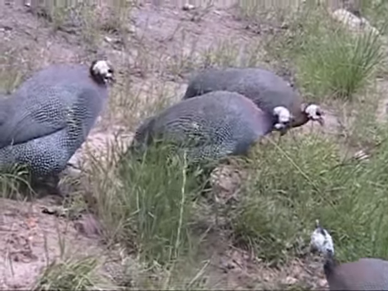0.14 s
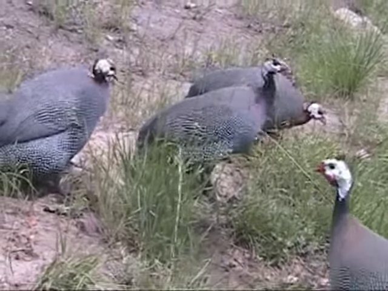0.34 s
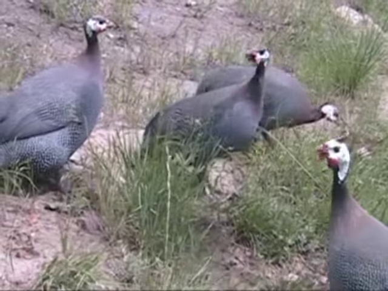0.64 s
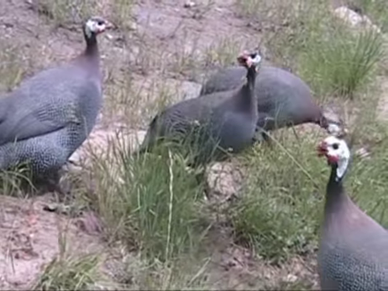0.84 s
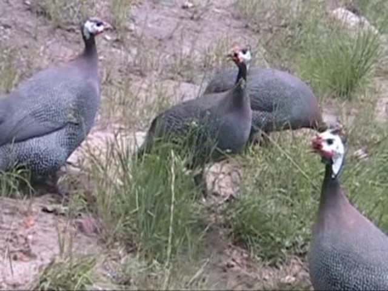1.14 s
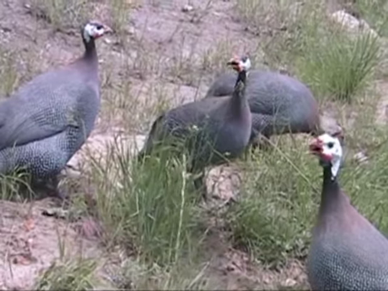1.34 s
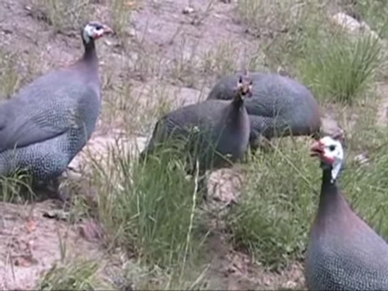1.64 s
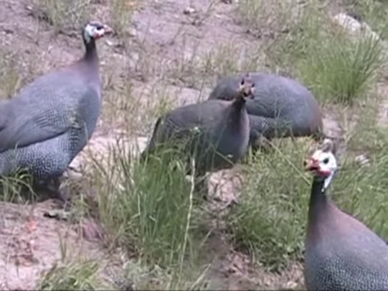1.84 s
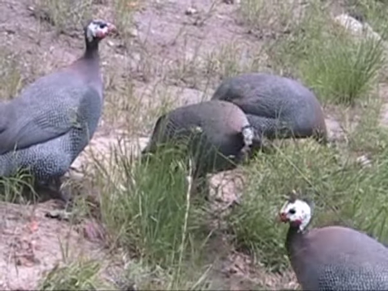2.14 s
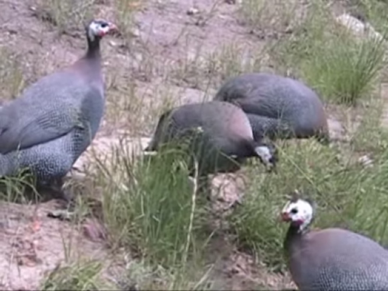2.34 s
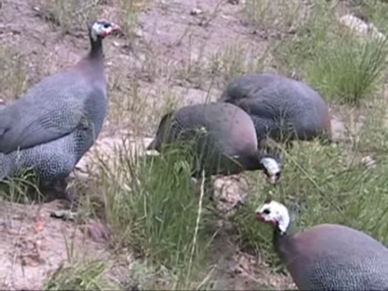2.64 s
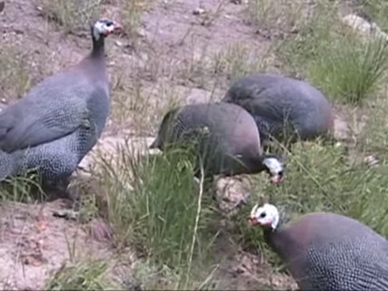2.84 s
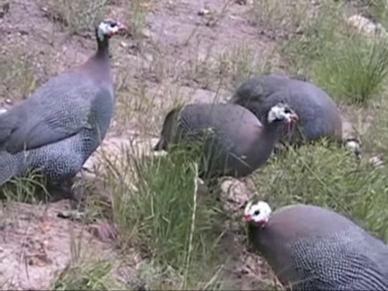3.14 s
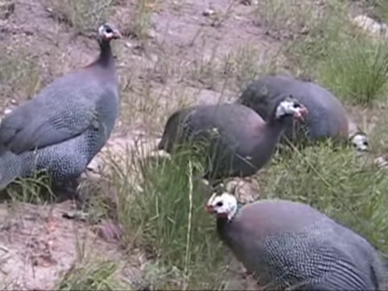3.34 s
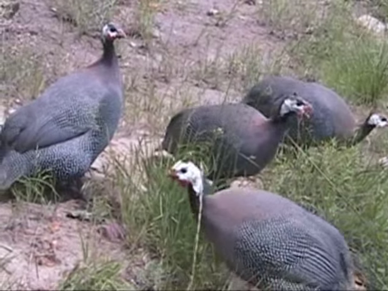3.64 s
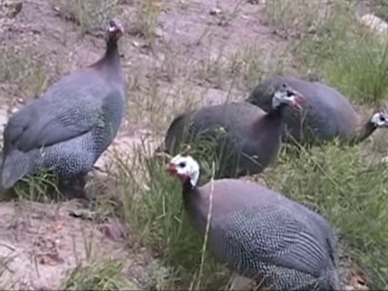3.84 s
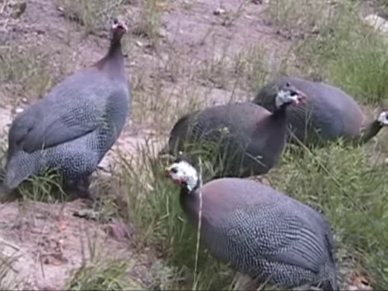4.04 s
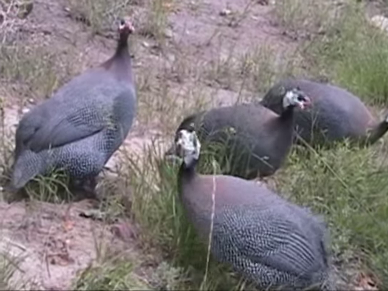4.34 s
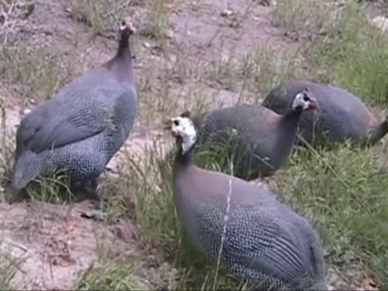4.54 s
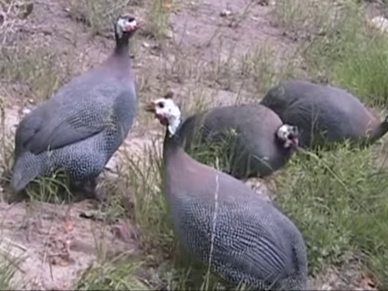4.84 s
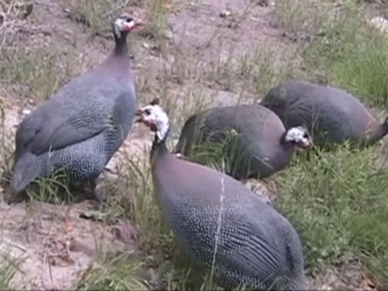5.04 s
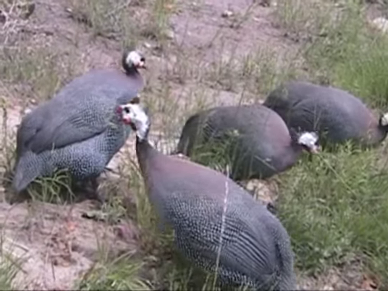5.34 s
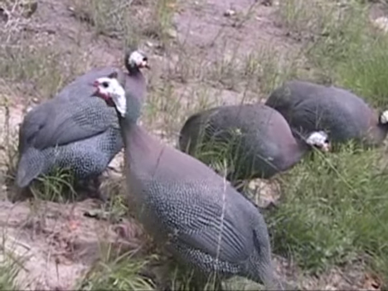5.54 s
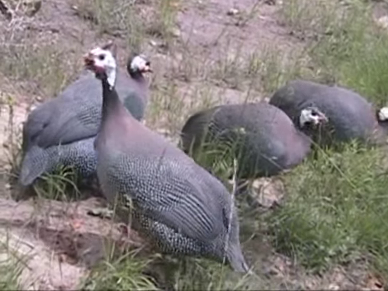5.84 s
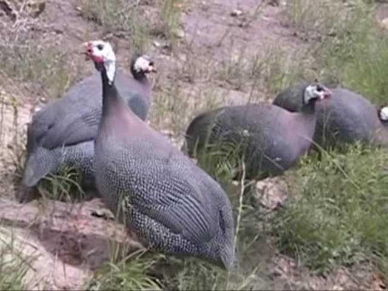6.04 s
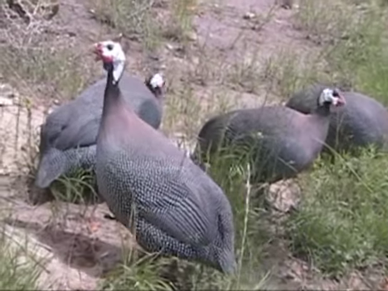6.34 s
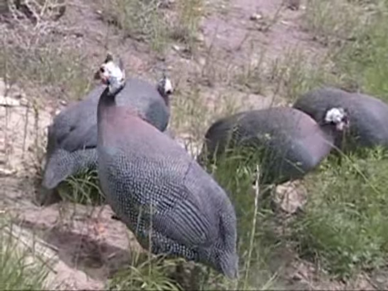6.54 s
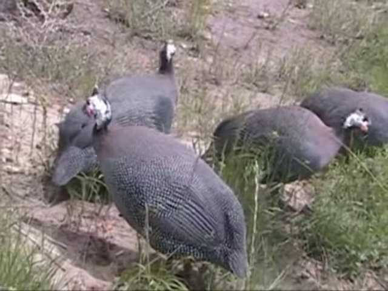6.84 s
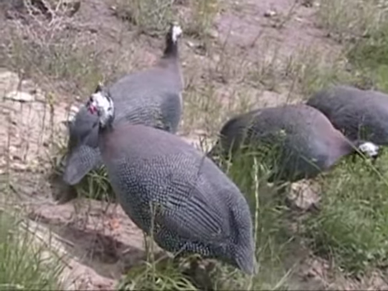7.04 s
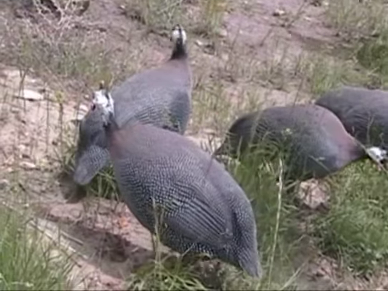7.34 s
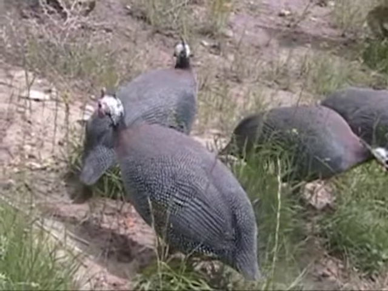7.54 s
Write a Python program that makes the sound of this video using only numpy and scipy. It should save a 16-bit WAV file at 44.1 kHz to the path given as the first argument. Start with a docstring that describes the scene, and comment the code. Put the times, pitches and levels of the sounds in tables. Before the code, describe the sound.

Harsh guinea fowl chatter outdoors: hard clipped cheks in steady runs, longer pulsing squawks, short rattles and squeaky peeps, with light wind buffeting.

```python
"""Guinea fowl call on a grassy slope: long fluttering squawks with short rattles, cheks and whistled peeps.
Squawks, rattles and the rasp of each chek drive throat and beak resonances with a rough pulsing voice;
cheks start with a hard whistle, and peeps are unsteady partials with hoarse breath. A short bright scatter
follows each call and a far wall returns it once. Lumpy wind noise buffets two microphone ports over a hush,
an uneven treble hiss and a faint hum."""
import sys
import numpy as np
from scipy import signal
from scipy.fft import rfft, irfft
from scipy.io import wavfile
from scipy.ndimage import uniform_filter1d

SR = 44100
rng = np.random.default_rng(int(sys.argv[2]) if len(sys.argv) > 2 else 0)


def pcm_store(signal):
    """Save signal as 16-bit PCM."""
    levels = np.round(np.clip(np.atleast_2d(signal), -1, 1) * 32767)
    wavfile.write(sys.argv[1], SR, levels.astype(np.int16).T)


N = 339570  # samples

# Wind buffeting the ports. Each row: frequency in Hz, relative density in dB per Hz.
BUFFET_SPECTRUM = [(20, -15), (54, 5.5), (104, 2), (255, -3), (576, -22.5), (972, -66)]
# Wind strength. Each row: time in seconds, push in opposite directions in dB, push on both alike in dB.
WIND_LEVELS = [(0, -36, -49), (.18, -52, -64), (.36, -28.5, -42.5), (0.801, -25, -37.5), (.96, -55, -45),
               (1.053, -29, -30), (1.16, -61, -66), (1.5, -62, -73), (2.2, -84, -77), (2.83, -34, -44),
               (3.08, -29, -44.5), (3.22, -52.5, -55), (5.9, -52.5, -59.5), (6.45, -64.5, -68.5),
               (6.7, -37.5, -47), (6.88, -51.5, -58.5), (7.46, -20.5, -36), (7.69, -56, -38)]
# Outdoor hush. Each row: frequency in Hz, relative density in dB per Hz.
HUSH_SPECTRUM = [(40, -50), (300, -6), (1000, -2), (2500, -9), (4500, -12), (6500, -23), (11000, -31),
                 (15500, -46.5)]
# Treble hiss of uneven level. Each row: frequency in Hz, relative density in dB per Hz.
TREBLE_HISS_SPECTRUM = [(1500, -38), (4500, -9.5), (8000, -0.5), (11500, -6.5), (15500, -23)]
# Quiet bed. Each row: time in seconds, level of hush and hum in dB, level of the treble hiss in dB.
BED_LEVELS = [(0, -52.5, -61.5), (1.5, -52.5, -59.5), (2.2, -56, -66), (3.0, -47, -65), (3.12, -48, -55.5),
              (3.38, -52, -53), (3.5, -45, -63), (4.2, -48, -53), (5.4, -49, -60), (6.7, -55.5, -67.5),
              (7.7, -48, -61.5)]
# Faint hum. Each row: frequency in Hz, level against the shared hush in dB.
HUM_TONES = [(150, -16.5)]
# Whistled peeps; the row at 7.289 s is the drawn-out whistle that opens the chek at 7.29 s. Each row: start in
# # seconds, length in seconds, middle pitch in Hz, glide from end to end in Hz, level in dB, hoarseness in dB,
# # place of the crest as a share of the length.
PEEP_CALLS = [(0.032, 0.072, 1193, 14, -25, -0.5, 0.8), (0.284, 0.071, 4220, -1100, -43, -2.5, 0.65),
              (0.37, 0.08, 2350, -54, -51, -24.5, 0.5), (0.468, 0.085, 2680, 141, -52, -17.5, 0.2),
              (0.562, 0.032, 5280, 552, -33.5, -6, 0.3), (0.59, 0.022, 5160, -200, -25, -6, 0.5),
              (0.613, 0.029, 4980, -170, -10.5, -16, 0.64), (0.636, 0.021, 4490, 69, -13, -14, 0.06),
              (0.637, 0.021, 2930, -150, -25, -14, 0.65), (0.638, 0.028, 1765, 12, -25.5, -9, 0.48),
              (0.817, 0.11, 1122, -33, -27, -7.5, 0.96), (1.801, 0.09, 1109, 140, -37, 2, 0.7),
              (2.092, 0.059, 1090, -61, -37.5, 2, 0.77), (2.295, 0.078, 3118, 171.5, -37, -12, 0.33),
              (2.315, 0.036, 1850, 18, -22, -20.5, 0.47), (2.345, 0.03, 1697, 34, -25.5, -16, 0.08),
              (2.36, 0.09, 3850, 84, -53, -12, 0.7), (2.529, 0.055, 1156, -20, -34.5, 6, 0.35),
              (2.538, 0.013, 3200, -170, -14, -9, 0.55), (2.796, 0.041, 3740, -600, -12, -9, 0.6),
              (2.816, 0.018, 1780, -220, -15, 4.5, 0.52), (2.962, 0.059, 1855, 155, -30.5, -28, 0.35),
              (2.977, 0.083, 1174, 113, -33, -14, 0.32), (3.389, 0.038, 3840, -340, -14.5, -7.5, 0.84),
              (3.404, 0.032, 1065, -40, -25.5, -15, 0.8), (3.405, 0.018, 1714, -330, -10, 1.5, 0.37),
              (3.669, 0.076, 1834, 43, -28.5, -39, 0.26), (3.697, 0.028, 1493, -100, -25, -23, 0),
              (3.683, 0.13, 1160, 81, -26, -21.5, 0.13), (3.807, 0.033, 1112, -112, -15.5, 0.5, 0.38),
              (4.157, 0.091, 1810, 221, -11.5, -15, 0.88), (4.195, 0.053, 1168, -54, -26.5, -27.5, 0.8),
              (4.213, 0.038, 3240, 145, -25.5, -25, 0.5), (4.347, 0.027, 1580, -260, -20, -43.5, 1),
              (4.351, 0.15, 1100, 71, -20.5, -13, 0.32), (4.406, 0.017, 3740, 814, -14, -38, 0.26),
              (4.585, 0.034, 1073, -18, -20.5, 0, 0.42), (4.851, 0.047, 2560, 191, -37.5, -16, 0.5),
              (5.016, 0.084, 1778, 111, -16, -11, 0.26), (5.023, 0.16, 1097, -12, -22.5, -20.5, 0),
              (5.083, 0.19, 2140, 27, -35.5, -9.5, 0.1), (5.044, 0.017, 3790, -200, -8.5, -1.5, 1),
              (5.052, 0.016, 3180, -560, -4, -12.5, 0.8), (5.551, 0.031, 1052, 127, -23.5, -10, 0.44),
              (6.781, 0.11, 1216, 45, -25.5, -9.5, 0.87), (7.044, 0.024, 3480, -520, -10, -16, 0.37),
              (7.05, 0.016, 1690, -150, -10, 1, 0.83), (7.289, 0.04, 3530, 40, -15, -16, 0.3),
              (7.56, 0.036, 1200, 52, -36.5, 8, 0.7), (7.568, 0.0185, 4190, -200, -29.5, -3, 0.2),
              (7.64, 0.049, 3030, -86.5, -38, -10, 0.1)]
# Short cheks. Each row: time near the hard start in seconds, level in dB, whistle pitch in Hz, first partial
# in dB, length in seconds, rasp in dB, treble in dB, low push in dB, ring in the beak in Hz, ring level in dB.
CHEK_CALLS = [(0.108, -14, 1836, -1.5, 0.08, -1, -9.5, -62, 4470, -3),
              (1.0785, -8.5, 1632, -4.5, 0.096, -9.5, -16, -33, 4208, -14),
              (1.3671, -8, 1672, -1.5, 0.091, -11, -13, -28, 4104, -9),
              (1.645, -8, 1654, -4.5, 0.089, -11.5, -13.5, -36, 4080, -10),
              (1.943, -9.5, 1656, -3.5, 0.079, -10, -13, -54, 4052, -8),
              (5.275, -9, 1650, -19, 0.076, -7, -18.5, -56.5, 4614, -11),
              (5.536, -9.5, 1569, -8.5, 0.031, -13, -31, -55, 3933, -4),
              (5.7453, -7.5, 1612, -12.5, 0.085, -9, -15.5, -56.5, 3978, -8),
              (6.0208, -8.5, 1664, -4, 0.076, -7, -15.5, -24.5, 4444, -5.5),
              (6.318, -9, 1608, -4.5, 0.081, -8, -11.5, -26.5, 3952, -3.5),
              (7.2908, -13, 1746, -2, 0.08, -1.5, -20, -39, 4200, -30)]
# Whistle of a chek: relative levels in dB, second partial upwards.
UPPER_PARTIALS_DB = [1, -5, -17.5, -25.5]
# Throat in the rasp and in hoarse breath. Each row: resonance in Hz, width in Hz, relative level in dB.
RASP_THROAT = [(1156, 22.7, 5), (2016, 520, 6), (2550, 170, 12), (3243, 220, 6), (4090, 360, -2),
               (4534, 1150, 4.5)]
# Rattles around the squawks. Each row: start in seconds, length in seconds, first level in dB,
# last level in dB, beak resonance at the start in Hz, throat against the beak in dB.
RATTLE_CALLS = [(0.835, 0.057, -27.5, -17.5, 4000, -12.5), (1.176, 0.14, -31, -27, 4070, -13.5),
                (1.268, 0.038, -25, -19, 4180, -3.5), (1.596, 0.054, -38.5, -13, 3660, -15),
                (1.856, 0.023, -24.5, -28.5, 4250, -1), (4.762, 0.0173, -32.5, -31.5, 3150, 8),
                (2.113, 0.033, -51, -32.5, 3550, -3), (5.584, 0.25, -23, -38, 3360, -12.5),
                (6.799, 0.096, -25.5, -20.5, 3150, -15)]
# Long squawks. Each row: start in seconds, length in seconds, release in seconds, effort in dB, change of
# effort in dB, base pitch in Hz, glide as a share of pitch, base throat resonance in Hz, base beak resonance
# in Hz, beak level in dB, base flutter per second, base side resonance of the throat in Hz, its level in dB,
# upper beak resonance in dB.
SQUAWK_CALLS = [(0.893, 0.17, 0.022, -12, -2.5, 384, -0.017, 2010, 4200, 1, 64, 1280, -1, 3.5),
                (2.559, 0.23, 0.053, -12.5, -7, 406.2, 0.016, 2014, 4140, -3.5, 60.5, 1604, 10, -3.5),
                (3.426, 0.16, 0.045, -16, -0.5, 388, -0.0019, 2600, 3700, -1, 61, 1840, -5, 1),
                (3.81, 0.28, 0.056, -12.5, -0.5, 394, 0.000034, 2250, 4050, -1.5, 63, 2100, 9, 0.5),
                (4.588, 0.173, 0.025, -14, 2, 386.3, 0.012, 2027, 3900, -1.5, 56, 2300, 11.5, -4.5),
                (6.892, 0.17, 0.018, -14, 0.5, 419, 0.024, 1690, 3700, -2, 63, 1300, 2, 1),
                (7.058, 0.22, 0.021, -18.5, 4.5, 409, 0.11, 1653, 3260, -4, 46.4, 1460, 9, -5.5)]
# Fixed windpipe under a squawk. Each row: resonance in Hz, width in Hz, relative level in dB.
WINDPIPE_RESONANCES = [(415, 77, -1.5), (829, 37, -9), (1330, 295, 4), (2133, 220, 11.5), (7500, 1500, -18)]

EDGE_HZ = 15670  # treble limit
ARCH_PER_S = 0.405  # longer peeps sag more at both ends
OVERTONES_DB, BREATH_DB = 1.1, -2  # both ride on the hoarseness of a peep
OVERTONES_DB_PER_OCTAVE = -5.5  # higher peeps are purer
CHEK_THROAT = 1.016  # scales the resonances of the rasp
WHISTLE_S = 0.017  # length of the whistled start; upper partials end sooner
RING_PARTIAL = 10  # the ring sits on this partial of the rasp
LOW_LINGERS_S = 0.0037  # per octave down
ATTACK_S, ATTACK_DB, RELEASE_DB = 0.015, -5, -11.5
START_SHARP, SETTLE_S = 0.16, 0.021  # a squawk starts this share high and settles
END_FLAT = 0.052  # share by which pitch and throat sag at the end
THROAT_FOLLOWS, BEAK_FOLLOWS = 3.36, 3.8  # throat and beak glide this many times as far as the pitch
BEAK_SAG, BEAK_FADE_DB, BEAK_SHUT_DB = 0.035, -3.5, -6  # the beak closes slowly, then shuts in the release


def amp(db):
    """Turns dB into gain."""
    return 10 ** (np.asarray(db) / 20)


def evened(x):
    """Scales to rms 1."""
    return x / np.sqrt(np.mean(x ** 2) + 1e-20)


def add(mix, s, sound):
    """Mixes a sound in at time s."""
    part = mix[round(s * SR):][:len(sound)]
    part += sound[:len(part)]


def drift(count, smooth_s):
    """Smooth random wander of rms about 1."""
    size = max(round(smooth_s * SR), 1)
    smooth = uniform_filter1d(uniform_filter1d(rng.standard_normal(count), size), size)
    return smooth * np.sqrt(1.5 * size)


def curves(rows):
    """Time from the start, and every column drawn out to sample rate."""
    s, *columns = np.transpose(rows)
    t = np.arange(s[0], s[-1], 1 / SR)
    return t - s[0], [np.interp(t, s, c) for c in columns]


def coloured(points):
    """Steady noise with the given spectrum, at rms 1."""
    f, db = np.transpose(points)
    hz = np.fft.rfftfreq(N, 1 / SR)
    gain = amp(np.interp(np.log(hz + 1), np.log(f), db))
    return evened(irfft(rfft(rng.standard_normal(N)) * gain, N))


def resonate(x, hz, width):
    """A steep resonance that follows the curve hz: shift to zero, smooth twice, shift back."""
    turn = np.exp(2j * np.pi * np.cumsum(hz * np.ones(len(x))) / SR)
    r = np.exp(-np.pi * width / SR)
    smooth = signal.lfilter([(1 - r) ** 2], [1, -2 * r, r * r], x / turn + 1e-18)
    return 2 * (turn * smooth).real


def wind():
    """Lumpy low noise that mostly pushes the two ports in opposite directions."""
    t = np.arange(N) / SR
    s, apart_db, alike_db = np.transpose(WIND_LEVELS)
    lumps_db = 3.9 * drift(N, 0.01) + 1.8 * drift(N, 0.051)
    push = coloured(BUFFET_SPECTRUM) * amp(np.interp(t, s, apart_db) + lumps_db)
    alike = signal.lfilter(*signal.butter(N=1, Wn=70, btype="high", fs=SR), coloured(BUFFET_SPECTRUM))
    return np.array([push, -push]) + alike * amp(np.interp(t, s, alike_db) + lumps_db)


def bed():
    """A partly shared hush, an uneven treble hiss separate in each port and a faint hum opposite in the two."""
    t = np.arange(N) / SR
    s, hush_db, hiss_db = np.transpose(BED_LEVELS)
    hush = coloured(HUSH_SPECTRUM) + 0.61 * np.array([coloured(HUSH_SPECTRUM), coloured(HUSH_SPECTRUM)])
    hum = sum(amp(db) * np.sqrt(2) * np.sin(2 * np.pi * hz * t) for hz, db in HUM_TONES)
    treble_hiss = np.array([coloured(TREBLE_HISS_SPECTRUM), coloured(TREBLE_HISS_SPECTRUM)])
    treble_hiss *= amp(np.interp(t, s, hiss_db) + 3.6 * drift(N, 0.028))
    return amp(np.interp(t, s, hush_db)) * (hush + np.array([hum, -hum])) + treble_hiss


def scatter_and_wall(x):
    """Short bright scatter after each call, different in each port; a smeared slap from a far wall, a dull tail."""
    t = np.arange(round(.5 * SR)) / SR
    taps = rng.standard_normal((2, len(t))) * (rng.random((2, len(t))) < .05)
    scatter = np.diff(taps, prepend=0) * amp(-9 - 60 * t / .02) * (t > .001)
    slap = amp(-42.5) * np.exp(-((t - .09) / 0.0097) ** 2)
    tail = amp(-42 - 60 * t / .5)
    far = (taps[0] + 0.4 * taps) * (slap + tail)
    far = signal.lfilter(*signal.butter(N=1, Wn=5000, fs=SR), far)
    return signal.fftconvolve(x[None], scatter + far, axes=1)[:, :N]


def ports(x, samples, db):
    """A call reaches the left port up to one sample before the right, and a little louder."""
    lead = np.exp(1j * np.pi * np.fft.rfftfreq(N) * samples)  # half the lead on each side
    return irfft(rfft(x) * np.array([amp(db) * lead, amp(-db) / lead]), N)


def fluttering(t, per_s, wander):
    """Phase of a wandering flutter that slows as the breath runs out."""
    rate = per_s * (1.03 - .3 * t) * (1 + wander * drift(len(t), .012))
    return 2 * np.pi * np.cumsum(rate) / SR


def membranes(hz, rough, jitter, unsteady_db):
    """Partials of the pitch, each with its own phase and unsteady strength, mixed with breath noise."""
    count = len(hz)
    turns = np.cumsum(hz * (1 + jitter * drift(count, 0.0024))) / SR
    partials = sum(np.cos(2 * np.pi * (k * turns + rng.random()))
                   * amp(unsteady_db * k * drift(count, 0.00099)) for k in range(1, 30))
    return (1 - rough) * evened(partials) + rough * rng.standard_normal(count)


def peep(length, mid_hz, glide_hz, db, hoarse_db, crest):
    """An unsteady whistle of a few partials, with hoarse breath through the throat."""
    u = np.arange(0, length, 1 / SR) / length  # share of the call gone by
    count = len(u)
    hz = mid_hz * (1 - ARCH_PER_S * length * (2 * u - 1) ** 2) + glide_hz * (u - .5)
    turns = np.cumsum(hz * (1 + .009 * drift(count, .004))) / SR
    over_db = hoarse_db + OVERTONES_DB + OVERTONES_DB_PER_OCTAVE * np.log2(mid_hz / 1000)
    step = .5 if 3000 < mid_hz < 4000 else 1  # such peeps are the second partial of a lower voice
    tone = np.zeros(count)
    for k, level_db in enumerate([0, over_db, over_db - 7.0, over_db - 13]):
        if (k + 1) * mid_hz < 10500:
            waver_db = (.5 + k) * drift(count, .006)
            tone += amp(level_db + waver_db) * np.sin(2 * np.pi * (1 + k * step) * turns)

    noise = rng.standard_normal(count)
    breath = evened(sum(amp(g + 3 * drift(count, .01)) * resonate(noise, f, w) for f, w, g in RASP_THROAT))
    fuzz = min(mid_hz / 6500, 1) ** 2  # high peeps breathe around the whistle itself
    breath = (1 - fuzz) * breath + fuzz * evened(resonate(noise, hz, 500))

    swell_db = np.interp(u, [0, np.clip(crest, .05, .95), 1], [-13, 0, -8])
    throb_depth = np.clip(amp(hoarse_db), 0, .45)  # hoarse peeps throb more
    throb = 1 + throb_depth * np.sin(fluttering(u * length, 60, .05))
    voice = np.sqrt(2) * tone + amp(hoarse_db + BREATH_DB) * breath
    return amp(db + swell_db) * throb * voice * signal.windows.tukey(count, .25)


def chek(peak_db, hz, low_db, length, rasp_db, treble_db, thump_db, ring_hz, ring_db):
    """A hard whistled start breaks into a noisy rasp whose throat sinks as the beak shuts."""
    t = np.arange(-.008, length + 0.031, 1 / SR)
    count = len(t)

    def shut(f):
        """The beak shuts on the treble first."""
        return 1 / (1 + np.exp((t - length - LOW_LINGERS_S * np.log2(3000 / f)) / 0.0038))

    lead_in = 0.1 * np.clip((t + 0.0065) / 0.0045, 0, 1)
    rise = 0.93 / (1 + np.exp(-(t - .002) / 0.00048)) + lead_in

    sharp_start = .3 * np.exp(-(t + .008) / .004)
    turns = np.cumsum(hz * (1 + sharp_start + .006 * drift(count, .003))) / SR
    lingering = 0.24 / (1 + (t / 0.039) ** 6)
    whistle = np.zeros(count)
    for k, db in enumerate([low_db] + list(UPPER_PARTIALS_DB), start=1):
        burst = 1.3 * np.exp(-(t * k ** 0.29 / WHISTLE_S) ** 2)
        whistle += amp(db) * np.sin(2 * np.pi * k * turns) * (lingering + burst)

    rasp_hz = ring_hz / RING_PARTIAL
    drive = membranes(np.full(count, rasp_hz), .38, jitter=.013, unsteady_db=.25)
    sink = CHEK_THROAT * (1 - 0.07 * t / length)
    rasp = np.zeros(count)
    for f, width, db in RASP_THROAT:
        level = amp(db + 2.6 * drift(count, .008))
        throat_hz = f * sink * (1 + .02 * drift(count, .015))
        rasp += level * resonate(drive, throat_hz, width) * shut(f)
    ring = amp(ring_db) * evened(resonate(drive, ring_hz, 200)) * shut(ring_hz)
    ring *= np.clip(t / 0.039, 0, 1) ** 2 * amp(2.0 * drift(count, .008))
    low_tone = amp(-33.5) * np.sin(2 * np.pi * rasp_hz * t) * np.clip(t / 0.096, 0, 1) * shut(hz)
    rasp = evened(rasp) + ring + low_tone

    hiss = resonate(rng.standard_normal(count), 7400, 7300)
    hiss = evened(resonate(hiss, 7660 * (1.1 - 3 * t), 10000))
    hiss *= amp(treble_db) * amp(-1500 * t ** 2 + 2.7 * drift(count, 0.015))
    thump = -amp(thump_db) * np.exp(-((t - .008) / 0.0031) ** 2)  # one low push just after the start
    noisy = (amp(rasp_db) * rasp + hiss * shut(4 * hz)) * amp(-40 * t)
    return amp(peak_db) * rise * (whistle * shut(hz) + noisy) + thump


def rattle(length, first_db, last_db, beak_hz, throat_db):
    """The flutter nearly shuts the voice off, leaving short bursts in the beak; a fuller throat fills the gaps."""
    t = np.arange(0, length, 1 / SR)
    bursts = np.sin(fluttering(t, 62, .06) / 2) ** 6
    drive = membranes(np.full(len(t), 390.), .4, jitter=.03, unsteady_db=.3)
    drive *= (.1 + 2 * amp(2 * throat_db) + bursts) * amp(1.5 * drift(len(t), .008))
    beak = evened(resonate(drive, beak_hz * (1 - 1.4 * t), 750))
    throat = resonate(drive, 2090, 420) + 0.56 * resonate(drive, 1620, 850) + 0.32 * resonate(drive, 395, 49)
    level = amp(first_db + (last_db - first_db) * t / length)
    return level * (beak + amp(throat_db) * evened(throat)) * signal.windows.tukey(len(t), .3)


def phrase(s, length, release, effort_db, change_db, hz, glide, throat_hz, beak_hz, beak_db):
    """Attack, hold and release of one squawk: rows of time, effort, pitch, throat, beak and beak level."""
    held = np.array([0, 0, 1, 1])
    shut = np.array([0, 0, 0, 1])
    flat = 1 - END_FLAT * shut
    moved = glide * held
    return np.transpose([s + np.array([0, ATTACK_S, length - release, length]),
                         effort_db + change_db * held + np.array([ATTACK_DB, 0, 0, RELEASE_DB]),
                         hz * flat * (1 + moved),
                         throat_hz * flat * (1 + THROAT_FOLLOWS * moved),
                         beak_hz * (1 + BEAK_FOLLOWS * moved - BEAK_SAG * (held + shut)),
                         beak_db + BEAK_FADE_DB * held + BEAK_SHUT_DB * shut])


def squawk(rows, per_s, side_hz, side_db, upper_db):
    """A flutter lets the pitch snap up and slide down, and lights the beak resonances one after the other."""
    t, (effort_db, hz, throat_hz, beak_hz, beak_db) = curves(rows)
    count = len(t)
    flutter = fluttering(t, per_s, 0.045)
    hz = hz * (1 + START_SHARP * np.exp(-t / SETTLE_S))
    slide = np.sin(flutter + 1.9) + .35 * np.sin(2 * (flutter + 1.9))
    drive = membranes(hz * (1 + 0.045 * slide), .18, jitter=.012, unsteady_db=.2)
    drive *= amp(.6 * drift(count, .006))
    depth = np.clip(.25 + .12 * drift(count, .02), 0, .7)  # wanders from beat to beat
    pulsing = 1 + depth * np.sin(flutter - 2)

    pipe = sum(amp(db) * resonate(drive, f, w) * (pulsing if f > 2 * hz[0] else 1)
               for f, w, db in WINDPIPE_RESONANCES)
    middle = amp(11.0) * resonate(drive * pulsing, throat_hz, 267)
    side = amp(side_db) * resonate(drive * pulsing, side_hz * hz / hz.mean(), 140)
    throat_share = np.sqrt(np.clip(1 - amp(2 * beak_db), .05, 1))  # power left over by the beak
    throat = evened(pipe + middle + side) * throat_share

    sweep = 1 + .04 * np.sin(flutter - .6) + .015 * drift(count, .008)
    lower, upper, top = (amp(3.6 * np.sin(flutter + 1.1 - lag) + 1.8 * drift(count, .02))
                         for lag in (0, 2.1, 3.4))
    beak = lower * resonate(drive, beak_hz * 0.867 * sweep, 810)
    beak += amp(upper_db) * upper * resonate(drive, beak_hz * 1.058 * sweep, 560)
    beak += amp(-9.5) * top * resonate(drive, 5100 * sweep, 370)
    return amp(effort_db) * (throat + amp(beak_db) * evened(beak)) * signal.windows.tukey(count, .04)


def flock():
    """All calls, dry: the squawking birds, the chekking bird and the peeping birds stand apart."""
    squawks, cheks, peeps = np.zeros((3, N))
    for s, *row in PEEP_CALLS:
        add(peeps, s, peep(*row))
    for s, *row in CHEK_CALLS:
        add(cheks, s - 0.0057, chek(*row))  # early, for the soft lead-in
    for s, *row in RATTLE_CALLS:
        add(squawks, s, rattle(*row))
    for row in SQUAWK_CALLS:
        add(squawks, row[0], squawk(phrase(*row[:10]), *row[10:]))
    return squawks, cheks, peeps


def scene():
    """Calls, their echoes and the air, in two channels."""
    squawks, cheks, peeps = flock()
    near = ports(squawks, 0.92, db=0.2) + ports(cheks, 1.0, db=0.15) + ports(peeps, 0.21, db=0.7)
    return near + scatter_and_wall(squawks + cheks + peeps) + wind() + bed()


def record(dry):
    """Soft overload that bends the loudest calls most, then the treble limit."""
    bent = np.tanh(0.8 * dry) / 0.79
    lowpass = signal.firwin(1023, EDGE_HZ, window=("kaiser", 9), fs=SR)
    return np.clip(signal.oaconvolve(bent, lowpass[None], "same"), -1, 1)


dry = scene()
out = record(dry)
pcm_store(out)
```